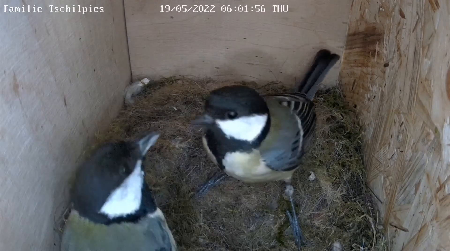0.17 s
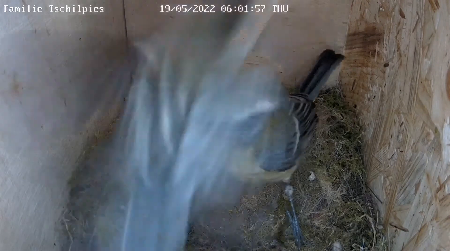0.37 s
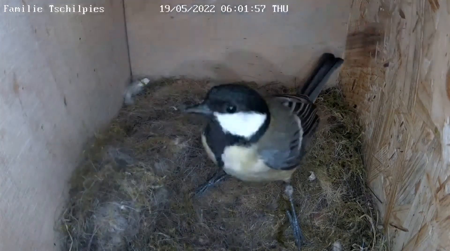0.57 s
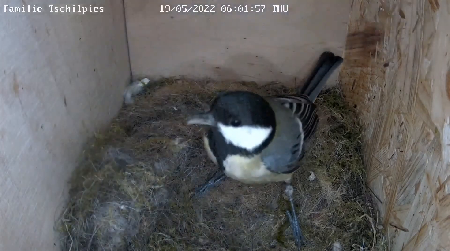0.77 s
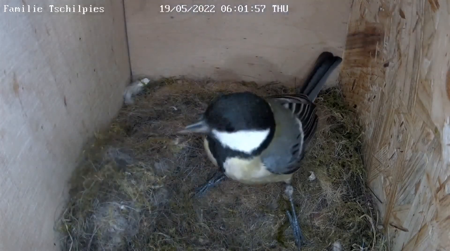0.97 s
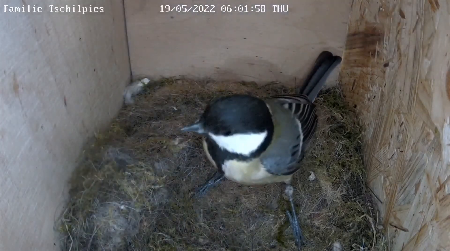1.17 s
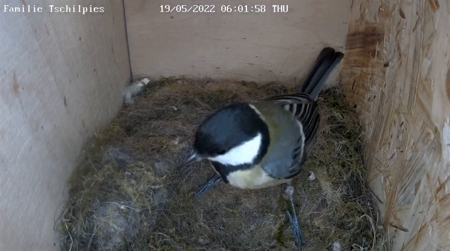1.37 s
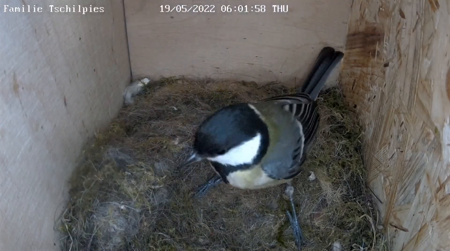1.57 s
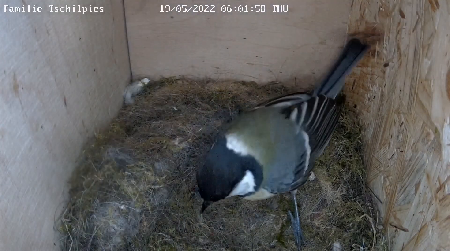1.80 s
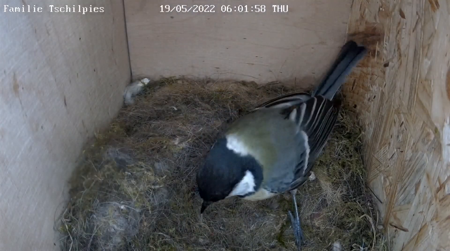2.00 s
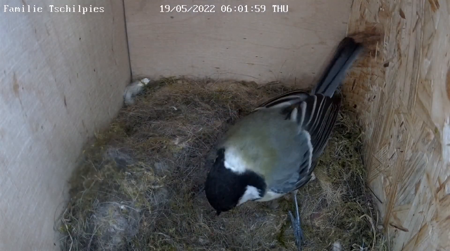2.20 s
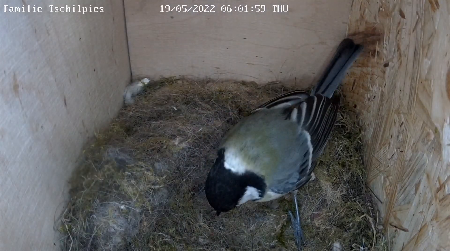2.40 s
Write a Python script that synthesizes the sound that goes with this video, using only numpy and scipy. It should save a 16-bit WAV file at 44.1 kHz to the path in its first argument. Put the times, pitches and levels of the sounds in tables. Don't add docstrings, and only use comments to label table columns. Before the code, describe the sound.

A small bird churrs close by in a wooden nest box: about eight harsh, raspy, rising notes from 0.05 to 0.55 seconds, loudest near 0.45. From 0.5 to 1.2, dull low wing and foot thumps shake the box, with claw ticks, feathery scraping and a tiny squeak. Afterwards only low hollow rumble and faint hiss remain, with a faint far bird warbling from about 1.2 to 2.5.

```python
import sys
import numpy as np
from scipy import signal
from scipy.fft import rfft, irfft, next_fast_len
from scipy.io import wavfile
from scipy.ndimage import map_coordinates

SR = 44100
rng = np.random.default_rng(int(sys.argv[2]) if len(sys.argv) > 2 else 0)


def pcm_store(signal):
    levels = np.round(np.clip(np.atleast_2d(signal), -1, 1) * 32767)
    wavfile.write(sys.argv[1], SR, levels.astype(np.int16).T)


def nominal_scale(level):
    x = np.asarray(level, float) / 20
    return 10 ** x


N = 108045
T = np.arange(N) / SR


def unit(x):
    return x / np.sqrt(np.mean(np.abs(x) ** 2) + 1e-20)


def noise():
    return rng.standard_normal(N)


def wobble(rate_hz):
    return map_coordinates(rng.standard_normal(int(N * rate_hz / SR) + 4), [T * rate_hz])


def swell(start_s, length_s, rise, fall):
    u = (T - start_s) / length_s
    return np.sin(np.pi / 2 * np.clip(np.minimum(u / rise, (1 - u) / fall), 0, 1)) ** 2


def glide(start_s, length_s, from_hz, to_hz):
    hz = from_hz + (to_hz - from_hz) * np.clip((T - start_s) / length_s, 0, 1)
    return np.exp(2j * np.pi * np.cumsum(hz) / SR)


def ringing(x, carrier, width_hz):
    pole = [1, -np.exp(-np.pi * width_hz / SR)]
    once = signal.lfilter([1], pole, x / carrier)
    return unit((signal.lfilter([1], pole, once) * carrier).real)


def shape(points):
    hz, db = np.transpose(points)
    return lambda f: nominal_scale(np.interp(np.log(f + 1), np.log(hz + 1), db, -120, -120))


def modes(peaks):
    return lambda f: sum(nominal_scale(db) * 1j * f * w / (c * c - f * f + 1j * f * w) for c, w, db in peaks)


def filtered(x, response):
    m = next_fast_len(N + 8192)
    return irfft(rfft(x, m) * response(np.fft.rfftfreq(m, 1 / SR)), m)[:N]


def boxed(x, tail_db, t60_s=0.15):
    count = SR // 5
    tail = rng.standard_normal(count) * nominal_scale(-60 * T[:count] / t60_s)
    return x + nominal_scale(tail_db) * signal.fftconvolve(x, tail / np.linalg.norm(tail))[:N]


# hz, db_per_hz
RUMBLE_SPECTRUM = [(19, -46.5), (21, 2.5), (80, -14.5), (190, -16.5), (230, -26), (340, -42.5), (560, -48),
                   (750, -63.5)]
# hz, db_per_hz
SHAKE_SPECTRUM = [(20, -1), (90, -5.5), (190, -8.5), (240, -26), (400, -36.5), (600, -36), (800, -68)]
# hz, width_hz, level_db
CAVITY_MODES = [(122, 37, 5), (198, 12, -4), (512, 72.8, 11)]
# time_s, level_db
SHAKE_LEVEL = [
    (0, -53.5),
    (0.3, -48),
    (0.501, -40),
    (0.899, -37),
    (1.15, -40),
    (1.35, -51.5),
    (1.552, -65.5),
    (2.45, -72),
]
# hz, db_per_hz
HISS_SPECTRUM = [(450, -36.5), (600, -3.5), (1200, -8), (2300, -12), (3500, -9), (6600, -11.5),
                 (7600, -12.5), (8700, -40)]


def background():
    def hollow(points):
        return unit(filtered(noise(), lambda f: shape(points)(f) * (1 + modes(CAVITY_MODES)(f))))

    time_s, level_db = np.transpose(SHAKE_LEVEL)
    shake_db = np.interp(T, time_s, level_db) + 0.43 * wobble(45)
    rumble = nominal_scale(-54.5 + 0.63 * wobble(24)) * hollow(RUMBLE_SPECTRUM)
    shake = nominal_scale(shake_db) * hollow(SHAKE_SPECTRUM)
    hiss = nominal_scale(-81.5) * unit(filtered(noise(), shape(HISS_SPECTRUM)))
    whine = nominal_scale(-100) * np.sin(2 * np.pi * 5110 * T)
    return rumble + shake + hiss + whine


# start_s, length_s, level_db, from_hz, to_hz
FAR_NOTES = [(1.15, 0.22, -76.5, 3380, 3340), (1.257, 0.07, -74, 3700, 3850),
             (1.31, 0.1, -72.5, 3900, 3800), (1.421, 0.059, -68.5, 3866, 3650),
             (1.271, .2, -81, 4350, 4300), (1.3, .11, -78, 5140, 5270), (1.359, 0.16, -68, 3283, 3400),
             (1.53, 0.22, -72, 3250, 3500), (1.656, 0.27, -74, 3630, 3460),
             (2.237, 0.19, -73.5, 3570, 3450), (2.363, 0.17, -73, 3500, 3320)]


def far_bird():
    air = noise() * nominal_scale(4 * wobble(60))
    out = np.zeros(N)
    for start_s, length_s, level_db, from_hz, to_hz in FAR_NOTES:
        band = ringing(air, glide(start_s, length_s, from_hz, to_hz), width_hz=380)
        out += nominal_scale(level_db) * swell(start_s, length_s, 0.3045, 0.56) * band
    return out


# start_s, peak_db, ring_hz, t60_s, first_swing (signed)
PANEL_BLOWS = [(0.339, -31.5, 120, 0.24, 0.62), (0.485, -25, 136.7, 0.14, 0.78),
               (0.509, -8.5, 41.5, 0.093, 0.88), (0.573, -9.5, 49.5, 0.071, 0.79), (.608, -27, 90, 0.11, 1),
               (0.619, -17, 140, 0.066, -1.57), (.636, -11, 176.7, 0.12, -0.67),
               (0.639, -23.5, 350.4, 0.13, 0.49), (0.7193, -17, 157, 0.046, -1.73),
               (0.724, -16, 181, 0.045, 0.81), (0.825, -29, 137.7, 0.15, -0.91),
               (0.854, -29, 125.4, 0.24, -0.9), (0.927, -29, 129.2, 0.18, -1.36),
               (0.946, -18, 130, 0.098, 0.92), (1.009, -9.5, 63.6, 0.051, -1.48),
               (1.028, -12, 61.8, 0.088, -1.02), (1.04, -17.5, 177.7, 0.081, -0.79),
               (1.0577, -15, 138, 0.055, 1), (1.061, -26, 74, 0.07, -1.3), (1.077, -15, 132, 0.041, -1.73),
               (1.089, -17.5, 61.6, 0.07, 1), (1.092, -18, 126.5, 0.062, 1), (1.138, -28.5, 122, 0.2, 0.88),
               (1.198, -37.5, 122, 0.16, 1), (1.231, -33, 31.16, 0.48, 0.64)]


def thumps():
    rise_cycles = 0.53
    out = np.zeros(N)
    for start_s, peak_db, ring_hz, t60_s, first_swing in PANEL_BLOWS:
        t = np.maximum(T - start_s, 0)
        envelope = nominal_scale(peak_db + 2.5 - 60 * t / t60_s) * (1 - np.exp(-t * ring_hz / rise_cycles))
        out += first_swing * envelope * np.sin(2 * np.pi * ring_hz * t)
    return out


# hz, width_hz, level_db
BOX_AIR = [(586, 170, -2.5), (1204, 51, -0.5), (1593, 260, 1), (2250, 62, -2.5), (2310, 560, -3),
           (2975, 96, -2.5), (3283, 200, -3.5), (3700, 220, 5.5), (4006, 120, -0.5), (4350, 340, -7.5),
           (4955, 160, 0.5), (5450, 53, -14), (5750, 44, -13.5), (6500, 100, -24)]


def box_air_even(f):
    return modes([(hz, width_hz, 0) for hz, width_hz, _ in BOX_AIR])(f)


# start_s, peak_db, ring_hz, wood_db
CLAW_TICKS = [(0.5866, -44, 2270, -52), (0.612, -36, 2970, -35.5), (0.636, -27, 3130, -43),
              (0.6399, -29, 3320, -36.5), (0.695, -52, 3750, -54), (0.7211, -51, 3240, -33.5),
              (0.7354, -50, 3700, -47), (0.7909, -59, 3350, -55.5), (0.824, -41.5, 3680, -60),
              (0.855, -50.5, 3140, -41), (0.8595, -45, 3010, -40.5), (0.9076, -38, 3460, -47.5),
              (0.9257, -36, 2870, -31), (0.9352, -47.5, 2450, -43.5), (1.055, -48, 2900, -44.5),
              (1.072, -52, 2720, -54), (1.0868, -32.5, 2760, -43), (1.1082, -33, 2800, -38),
              (1.114, -38, 3310, -41), (1.1844, -70, 3400, -52), (1.2243, -71, 3320, -59)]


def ticks():
    ring, knock = np.zeros(N), np.zeros(N)
    for start_s, peak_db, ring_hz, wood_db in CLAW_TICKS:
        t = np.maximum(T - start_s, 0)
        air = noise()
        burst = ringing(air, glide(start_s, 1, ring_hz, ring_hz), width_hz=350) + 0.2 * air
        ring += nominal_scale(peak_db - 5.5 - 60 * t / 0.035) * (1 - np.exp(-t / 0.003)) * burst
        knock += nominal_scale(wood_db + 2 - 60 * t / 0.011) * (T > start_s) * air
    band = shape([(1200, -30), (2200, 0), (6000, -3), (7500, -30)])
    return filtered(ring, lambda f: band(f) * (1 + box_air_even(f))), knock


def squeak():
    start_s, length_s, pitch_hz = 0.693, 0.068, 1720
    tone = glide(start_s, length_s, pitch_hz, pitch_hz).real
    return nominal_scale(-60) * swell(start_s, length_s, 0.2, 0.5) * tone * nominal_scale(3 * wobble(60))


def grains():
    grains_per_s, grain_db = 4000, 3
    hits = rng.random(N) < grains_per_s / SR
    return unit(noise() * (0.43 + hits * nominal_scale(grain_db * rng.exponential(size=N))))


# start_s, length_s,
# hiss_db, wood_db, hiss_hz
STROKES = [(-.06, 0.48, -65.5, -64, 3058), (0.36, 0.42, -66.5, -48.5, 3170),
           (0.582, 0.027, -59.5, -54.5, 3160), (0.602, 0.033, -51.5, -44, 3000),
           (0.623, 0.039, -44, -38, 3270), (0.651, 0.072, -68, -59.5, 2710),
           (.716, 0.014, -58.5, -40, 2830), (0.73, 0.033, -62.5, -45.5, 2997),
           (0.748, 0.12, -76, -58, 3170), (0.814, 0.039, -55, -48, 3370), (0.841, 0.066, -59, -46, 3250),
           (0.885, 0.11, -61, -52, 3430), (0.909, 0.054, -55.5, -44.5, 3078),
           (0.964, 0.13, -74.5, -70, 3320), (1.033, 0.064, -72, -54, 2930),
           (1.067, 0.031, -69.5, -51, 2900), (1.084, 0.016, -59.5, -49.5, 3010),
           (1.095, 0.037, -59, -43, 3100), (1.124, 0.064, -78, -57.5, 3300),
           (1.177, 0.04, -80, -62.5, 3190), (1.215, 0.034, -83, -69, 3220), (1.24, 0.34, -87.5, -79, 4040)]
# hz, db_per_hz
FEATHER_SPECTRUM = [(1400, -29.5), (2100, -13), (2500, -4.5), (3000, -14.5), (4200, -5.5), (4700, -13),
                    (6500, -18.5), (7500, -51)]
# hz, width_hz, level_db
WALL_MODES = [(283.4, 20, 1), (359, 15, -5), (507, 51, -1.5), (648, 28, -8.5), (930, 38, -12.5),
              (1069.5, 81, -2), (1660, 150, -14.5)]


def scrabble():
    tail_db = -23

    def feather(f):
        return shape(FEATHER_SPECTRUM)(f) * (1 + 0.25 * box_air_even(f))

    def wall(f):
        return modes(WALL_MODES)(f) / (1 + 1j * f / 1420) ** 4

    brush = grains() * nominal_scale(2.2 * wobble(150))
    scratch = grains() * nominal_scale(2.2 * wobble(90))
    hiss, wood = np.zeros(N), np.zeros(N)
    for start_s, length_s, hiss_db, wood_db, hiss_hz in STROKES:
        stroke = swell(start_s, length_s, 0.27, 0.8)
        focus = ringing(brush, glide(start_s, length_s, hiss_hz, hiss_hz), width_hz=750)
        hiss += nominal_scale(hiss_db) * stroke * (nominal_scale(-9) * brush + focus)
        wood += nominal_scale(wood_db) * stroke * scratch
    ring, knock = ticks()
    hiss = filtered(boxed(hiss, tail_db), feather) / np.std(filtered(brush, feather))
    wood = filtered(wood + knock, wall) / np.std(filtered(scratch, wall))
    return hiss + boxed(ring + squeak(), tail_db) + wood


# start_s, length_s, level_db, beak_from_hz, beak_to_hz
CHURR_NOTES = [
    (0.058, 0.073, -33.5, 2730, 2900),
    (0.104, 0.041, -27.5, 3130, 3032),
    (0.163, 0.07, -27, 2800, 2892),
    (0.261, 0.08, -21, 2790, 3352),
    (0.348, 0.072, -17, 2800, 3410),
    (0.429, .066, -16, 2706, 3450),
    (0.482, 0.041, -26, 2500, 2993),
    (0.512, 0.05, -21.5, 2880, 3347),
]
# hz, level_db
VOICE_SPECTRUM = [(420, -31), (1160, -12.5), (1390, -20.5), (1640, 3.5), (2030, -13), (2500, -6.5),
                  (5700, -13.5), (6700, -38)]


def churr():
    pulse_hz, jitter, breath = 342.8, 0.1, 0.4
    phase = np.cumsum(pulse_hz * (1 + jitter * wobble(150))) / SR
    pulses = np.diff(np.floor(phase), prepend=0) * nominal_scale(2.2 * noise())
    rasp = unit(noise() * np.exp(-0.24 * (phase % 1)) * nominal_scale(2.5 * wobble(90)))
    source = np.sqrt(1 - breath) * unit(pulses) + np.sqrt(breath) * rasp
    lumps = np.sin(np.pi * phase) ** 2 * nominal_scale(1.5 * wobble(250))
    drift = np.exp(1j * 1.1 * wobble(220))
    voice = nominal_scale(-40) * swell(-0.23, 0.92, 0.16, 0.12) * rasp
    for start_s, length_s, level_db, from_hz, to_hz in CHURR_NOTES:
        beak = glide(start_s, length_s, from_hz, to_hz)
        u = (T - start_s) / length_s
        flutter = np.clip(0.55 + 0.4 * u, 0, 1)
        whistle = unit((beak * drift).real * (1 - flutter + 2 * flutter * lumps))
        opening = nominal_scale(10 * (np.clip(u, 0, 1) + 0.1739))
        note = opening * rasp * (0.5 + lumps)
        note += nominal_scale(3.5) * ringing(source, beak, width_hz=650)
        note += nominal_scale(8.5) * whistle
        voice += nominal_scale(level_db) * swell(start_s, length_s, 0.4, 0.3) * note

    def voice_in_box(f):
        return shape(VOICE_SPECTRUM)(f) * (nominal_scale(-16) + modes(BOX_AIR)(f))

    return filtered(boxed(voice, tail_db=-19), voice_in_box)


def scene():
    return (background() + far_bird() + thumps() + scrabble() + churr())[None]


def top_cut(x):
    return signal.sosfilt(signal.butter(12, 8700, fs=SR, output="sos"), x)


def record(dry):
    mix = dry + nominal_scale(-103) * rng.standard_normal(dry.shape)
    return top_cut(mix)


dry = scene()
out = record(dry)
pcm_store(out)
```